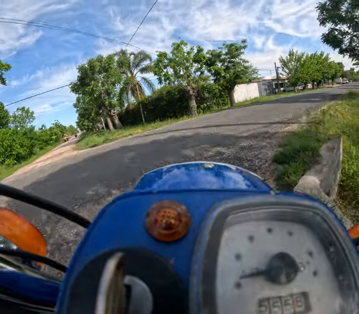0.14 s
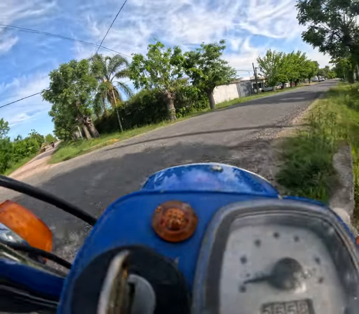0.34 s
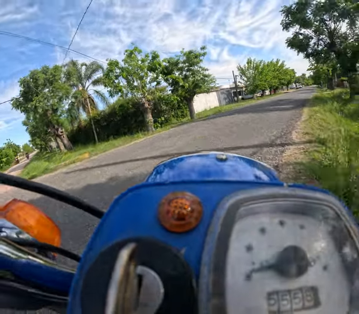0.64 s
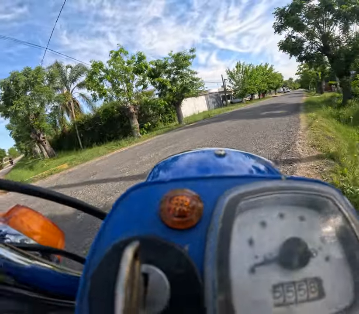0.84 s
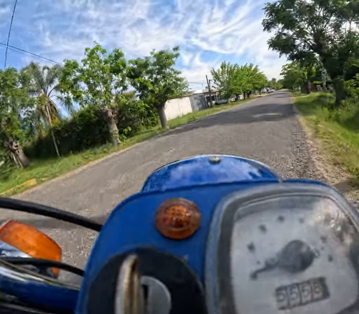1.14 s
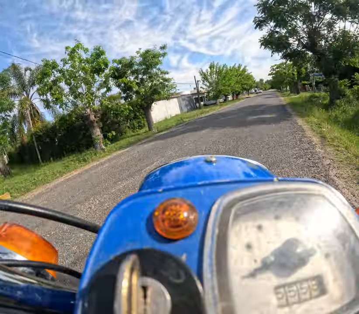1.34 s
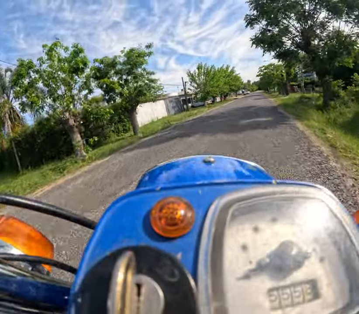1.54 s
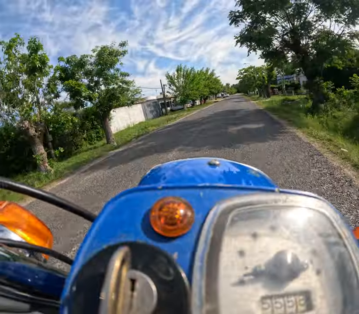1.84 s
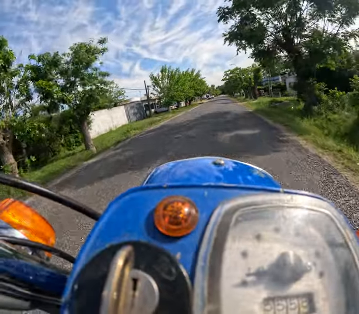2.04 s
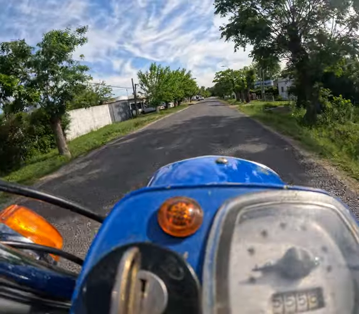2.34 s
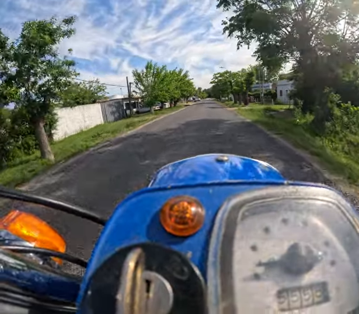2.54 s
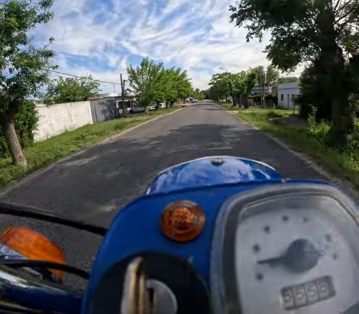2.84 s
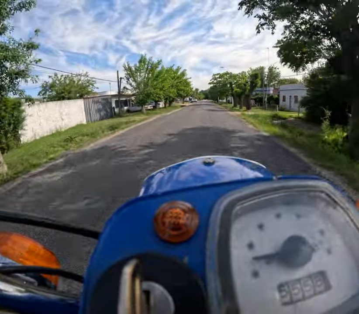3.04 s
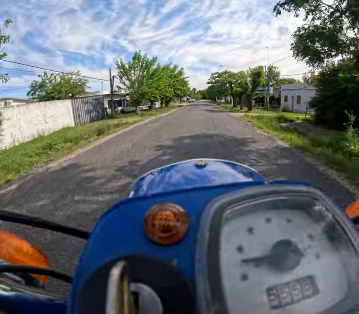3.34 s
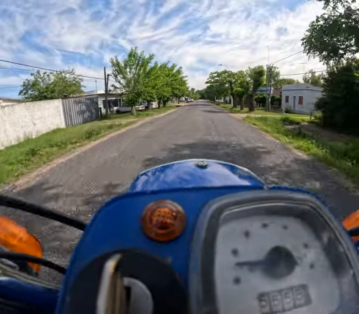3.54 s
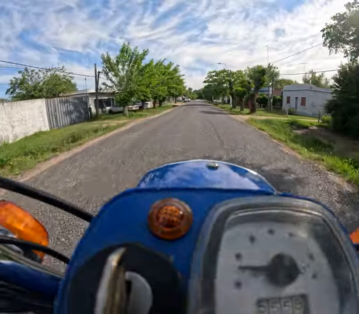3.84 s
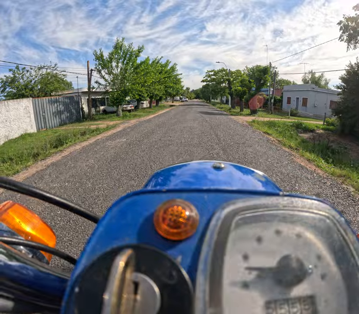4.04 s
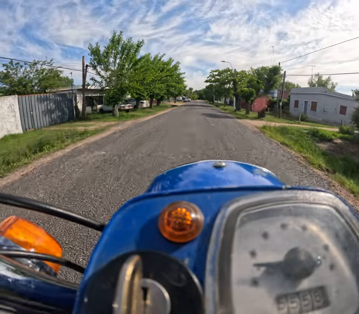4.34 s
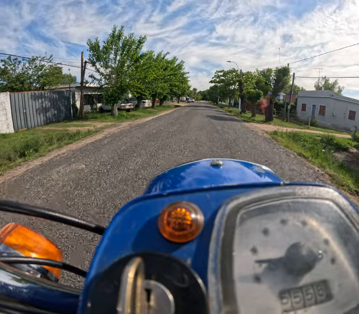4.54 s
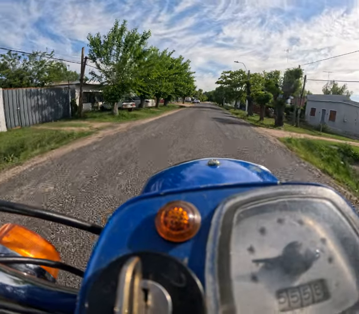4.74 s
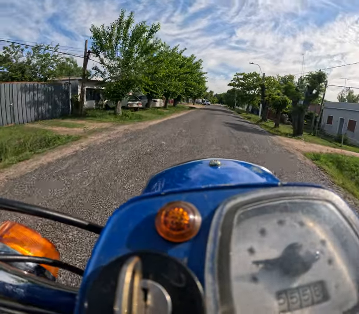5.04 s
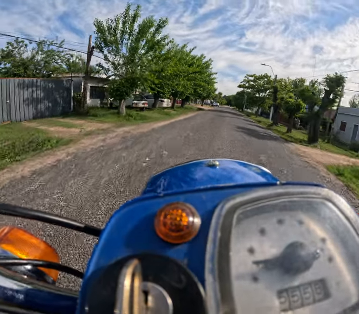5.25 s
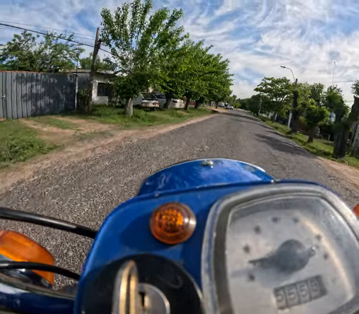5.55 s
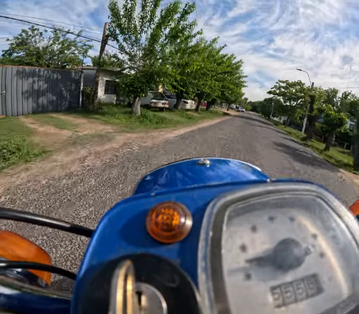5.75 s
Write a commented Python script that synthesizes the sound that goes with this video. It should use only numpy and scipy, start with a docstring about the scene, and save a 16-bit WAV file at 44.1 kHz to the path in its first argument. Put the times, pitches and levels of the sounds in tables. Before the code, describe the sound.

A small two-stroke moped is heard close up from behind its handlebar, with tyres roaring on asphalt and wind buffeting the microphone throughout. The engine putters at first, then at about 0.6 seconds the throttle opens with a brief bark into a raspy, clattering drone, rising in pitch until nearly 2 seconds and sagging slightly afterwards. Bumps knock the plastic panels around 0.7 to 1.1 seconds, ending in a sharp clack. At about 2.8 seconds the throttle shuts, the engine stumbles in a few dull thumps, and its note drops and fades. The moped coasts on with humming bodywork and low wind rumble. Irregular hollow pops burble in the exhaust from about 3.3 to 5.3 seconds, thickest between 3.7 and 4.7. Loose metal fittings rattle lightly around 3.7 seconds, and from 5 seconds to the end a run of bumps brings more thuds and rattles.

```python
"""A small two-stroke moped pulls away along a street, heard from just behind its handlebar.
Its firings drone and pop through the exhaust while piston and gears clatter; near three seconds the
throttle shuts and it coasts, stray charges burbling in the pipe. Tyres roar on asphalt, the bodywork
hums, wind buffets the microphone, and bumps knock the plastic panels and rattle loose fittings."""
import sys
import numpy as np
from scipy import signal
from scipy.fft import rfft, irfft, next_fast_len
from scipy.io import wavfile

SR = 44100
rng = np.random.default_rng(int(sys.argv[2]) if len(sys.argv) > 2 else 0)


def unload_audio(sound):
    """Save the sound as a 16-bit wav file, at the path given as the first command line argument."""
    columns = np.transpose(np.atleast_2d(sound))
    # keep every value between -1 and 1, then stretch to whole-number steps
    steps = np.round(np.clip(columns, -1, 1) * 32767)
    wavfile.write(sys.argv[1], SR, steps.astype(np.int16))


N = 259749
T = np.arange(N) / SR

# engine speed: time_s, firings_per_s
ENGINE_SPEED = [(0, 59.3), (.1, 59.9), (.3, 63.2), (.7, 68), (1.0, 71.4), (1.5, 73.3), (1.8, 73.5),
                (2.1, 71.5), (2.4, 70.7), (2.76, 68.6), (2.85, 65.7), (3.1, 57.3), (4.2, 46.5), (5.89, 40)]
# engine load, before the fall at throttle-off: time_s, pop_db, snarl_db
ENGINE_LOAD = [(0, -29, -56), (.3, -27, -68), (.5, -32, -45), (.7, -27, -35.5), (1.0, -33, -38.5),
               (1.6, -35, -36), (2.1, -49.5, -36), (2.4, -37, -31), (2.82, -35.5, -35)]
# thin top-end sizzle: time_s, level_db
SIZZLE_LEVEL = [(0, -90), (.65, -65), (1.1, -67), (2.0, -67), (2.8, -85), (3.0, -110), (4.9, -84.5),
                (5.5, -73), (5.89, -74)]
# tyres on the changing surface: time_s, roar_db, grit_db
TYRE_LEVELS = [(0, -27.5, -54), (.8, -23.5, -46), (1.6, -28, -49), (2.78, -33.5, -49), (2.98, -39, -74),
               (3.25, -36, -67), (3.65, -31, -54.5), (4.4, -29.5, -56), (5.3, -31, -54.5), (5.89, -33, -57)]
# bodywork hum: time_s, level_db
HUM_LEVEL = [(0, -35.5), (.8, -32), (1.6, -42.5), (3.35, -33), (3.8, -30), (4.25, -31.5), (4.55, -29),
             (4.8, -32), (5.05, -30.5), (5.3, -31.5), (5.89, -32.5)]
# wind bed: time_s, buffet_db, rumble_db
WIND_LEVELS = [(0, -27, -36), (.45, -23, -31), (.7, -23.5, -35), (1.0, -22, -41), (1.25, -24.5, -28),
               (1.5, -26.5, -37), (2.1, -28.5, -36), (2.9, -23, -24), (3.35, -26.5, -26), (4.3, -25, -25),
               (4.95, -28.5, -30), (5.6, -23, -31), (5.89, -27.5, -25)]
# gusts over the bed: centre_s, half_width_s, lift_db
GUSTS = [(1.056, 0.11, 4.5), (2.338, 0.08, 5), (2.782, 0.11, 2.5), (3.58, 0.049, 3.5), (4.55, 0.18, 4),
         (5.449, 0.072, 1.5)]
# bumps shaking the front end: start_s, thud_db, clack_db, decay_s
BUMPS = [(.725, -37, -31, 0.0089), (.915, -25, -26, 0.026), (1.051, -23, -13, 0.0029),
         (3.744, -29, -32, 0.015), (4.157, -33, -30.5, 0.028), (5.136, -21.5, -34, 0.014),
         (5.230, -20.5, -29.5, 0.018), (5.32, -17, -28.5, 0.018), (5.40, -27, -31, 0.0097),
         (5.522, -21, -41, 0.018), (5.687, -21.5, -44, 0.01)]
# loose fittings rattling: start_s, level_db, ring_offset_db, decay_s
RATTLES = [(.727, -36, 0, .007), (.93, -44, -6, .007), (1.05, -32, -2, 0.0065), (3.631, -32.5, -11, 0.008),
           (3.693, -36, -4, 0.0088), (3.7502, -34.5, -5, 0.0069), (3.8322, -41, -4, .008),
           (4.1631, -38.5, -7, 0.0085), (5.032, -31.5, -8, 0.007), (5.143, -32.5, 0, 0.0044),
           (5.162, -41, 5, .004), (5.2432, -32, -5, 0.004), (5.328, -39.5, 2, 0.008),
           (5.408, -37, -8, .007), (5.421, -37, -15, .005), (5.462, -46, 4, .004), (5.526, -30, -4, 0.0064),
           (5.6935, -41, 1, .008), (5.771, -35, -11, .003), (5.828, -34, -3, 0.0072)]
# last stumbling firings: centre_s, thump_db
SPUTTERS = [(2.885, -21), (2.942, -16.5), (2.975, -21), (3.013, -17), (3.05, -26)]
# stray charges in the pipe: start_s, level_db
BURBLES = [(3.258, -17.5), (3.677, -10), (3.791, -20), (3.861, -19), (3.897, -13), (3.969, -18),
           (4.023, -18), (4.26, -16.5), (4.296, -11.5), (4.409, -9), (4.469, -13), (4.532, -11),
           (4.591, -13), (4.635, -9.5), (4.83, -16), (4.91, -11.5), (5.255, -13.5)]

# bodywork resonances and dips: centre_hz, width_hz, lift_db
BODY_RESONANCES = [(347, 88, 9.5), (579, 172, 6.5), (827, 140, -4), (1124, 356, 6), (1349, 93, 3),
                   (2350, 96, 1.5), (2530, 100, -2.5), (2730, 92, 0.5), (3386, 96, 1), (3660, 200, 2.5),
                   (3840, 65, -5.5), (4600, 140, 2), (5560, 290, 2.5), (6260, 650, 3), (12700, 1500, 5.5)]
# tone colour of each layer before the bodywork: frequency_hz, relative_db
RASP_EQ = [(100, -20), (190, 4), (260, -0.5), (450, 3), (850, -1), (1400, 3.5), (2000, -3.5), (2800, -7),
           (3900, -8.5), (5000, -21), (7500, -28.5), (9000, -43.5), (13000, -55), (16000, -71)]
KNOCK_EQ = [(200, -27), (300, 15), (430, -0.5), (700, -1.5), (850, -10), (1300, 5), (1650, -10.5),
            (2000, -13), (3200, 1.5), (5000, -46.5), (16000, -72)]
POP_EQ = [(150, -38.5), (250, -6), (320, -11.5), (385, 10.5), (425, 3.5), (490, -25), (570, -20.5),
          (800, -6.5), (1200, -22.5), (2000, -30.5), (5000, -57.5), (16000, -87)]
SNARL_EQ = [(500, -19.5), (1000, -21.5), (1350, -19.5), (1480, -5), (1570, 2.5), (1720, 0), (1900, -10),
            (4200, -19.5), (6000, -38.5), (16000, -77)]
SHELL_EQ = [(350, -37), (520, -26), (610, 13.5), (760, -27), (1000, -2), (1170, 8.5), (1350, -5),
            (1600, -19.5), (5000, -44), (16000, -86)]
SIZZLE_EQ = [(6000, -33.5), (11500, -16.5), (12200, 4.5), (13500, 3), (15500, -27.5)]
HUM_EQ = [(150, -35), (255, -6.5), (300, -7.5), (338, -5), (380, -5.5), (450, -15), (900, -55),
          (4000, -78.5)]
ROAR_EQ = [(200, -0.5), (450, 0.5), (830, 1), (1350, -2), (2000, -5.5), (2900, -8), (3600, -12.5),
           (4300, -29.5), (7000, -44.5), (16000, -84.5)]
GRIT_EQ = [(2500, -27.5), (4000, 1), (5000, -3.5), (7300, -8.5), (9000, -20), (12000, -25.5),
           (16000, -47.5)]
BUFFET_EQ = [(15, -17), (40, -23), (60, 1), (110, -0.3), (170, -5.5), (250, -17), (450, -36), (2000, -74),
             (16000, -100)]
RUMBLE_EQ = [(5, -12.5), (18, 4), (28, -1), (45, -0.5), (70, -10.5), (300, -61.5), (16000, -110)]
THUD_EQ = [(150, -6), (450, 5.5), (900, 2.5), (1500, -1), (2100, -9), (3600, -28), (5000, -34),
           (16000, -71)]
CLACK_EQ = [(600, -15.5), (1500, -3), (2200, -0.5), (2900, 2.5), (3600, -6.5), (4400, -15.5), (5500, -21.5),
            (16000, -52)]
JINGLE_EQ = [(800, -1), (3000, 9.5), (4500, 8.5), (6000, 3.5), (8000, -11.5), (10500, -9), (12500, -18),
             (16000, -29)]
# ringing metal of the cooling fins, a panel bracket and a loose fitting: pitch_hz, gain_db, t60_s
FIN_MODES = [(1064, -19.5, 0.043), (1164, -19.5, 0.05), (1710, -25, 0.035), (2288, -25.5, .04),
             (2710, -21.5, 0.055), (2834, -21.5, 0.035), (3310, -22.5, .035), (3410, -20, 0.045)]
BRACKET_MODES = [(1910, 3, .08), (2760, 12, 0.058), (3020, -6, .05), (3180, 7, .045), (4000, 6, 0.045)]
FITTING_MODES = [(2280, 8, .05), (4050, 2, .04), (4910, 5.5, 0.057), (5400, 5, .04), (5620, 11, 0.062),
                 (5900, 6, .05), (6330, 3, .04), (6880, 3, 0.044), (7450, -1, .035), (10100, -10, .03),
                 (12230, -11, .03)]

# exhaust harmonics 1-3, moved on and off the pipe's resonances by the revs: level_db, slope_db_per_hz
PUTTER = [(-19, -1.94), (-25, -0.22), (-28, -0.38)]
DRONE = [(-24, 1.5), (-17, -0.33), (-33, -1.7)]
PUTTER_HZ, DRONE_HZ = 62.6, 68.6   # firing rates the slopes start from
BARK_DB, BARK_HOLD_S = (-7.5, 0.5, 8.5), 0.23   # harmonics 1-3 tilt bright as the throttle opens
OPEN_S, SHUT_S, TWIST_S = 0.639, 2.826, 0.026   # throttle cues; length of one turn of the grip


def from_db(db):
    """Decibels to gain."""
    return 10 ** (np.asarray(db) / 20)


def unit_power(x):
    """Scale to an RMS of one."""
    return x / np.sqrt(np.mean(x ** 2) + 1e-20)


def curves(rows):
    """Each column of a timed table, drawn out to every sample."""
    times, *columns = np.transpose(rows)
    return [np.interp(T, times, column) for column in columns]


def drift(rate_hz):
    """Smooth random wobble with a spread of one."""
    pole = np.exp(-80 * np.pi * rate_hz / SR)
    slow = signal.lfilter([1], [1, -2 * pole, pole * pole], rng.standard_normal(N // 40 + 2002))[2000:]
    return np.interp(np.arange(N) / 40, np.arange(len(slow)), unit_power(slow))


def twist(at_s):
    """A quick turn of the grip, from 0 to 1."""
    return np.clip((T - at_s) / TWIST_S + .5, 0, 1)


def fade(from_s, fade_s):
    """Holds at 1, then dies away."""
    return np.exp(-np.maximum(T - from_s, 0) / fade_s)


def burst(start_s, rise_s, decay_s):
    """A quick swell that dies away."""
    age = np.maximum(T - start_s, 0)
    return (1 - np.exp(-age / rise_s)) * np.exp(-np.minimum(age / decay_s, 20))


def throttle_off(drop_db, settle_s):
    """Gain that ducks an engine layer once the throttle shuts."""
    return from_db(-drop_db * (1 - fade(SHUT_S - TWIST_S / 2, settle_s)))


def through_body(x, eq):
    """Colour a layer with its own EQ and the bodywork resonances, at unit power gain."""
    size = 2 * next_fast_len(N // 2 + SR // 10)
    hz = np.arange(size // 2 + 1) * SR / size
    eq_hz, eq_db = np.transpose(eq)
    db = np.interp(np.log(hz + 1), np.log(eq_hz), eq_db)
    for centre, width, lift in BODY_RESONANCES:
        db += lift / (1 + (2 * (hz - centre) / width) ** 2) ** 2
    cepstrum = irfft(np.log(unit_power(from_db(db))))
    cepstrum[1:size // 2] *= 2   # minimum phase: resonances ring after the blow
    cepstrum[size // 2 + 1:] = 0
    return irfft(rfft(x, size) * np.exp(rfft(cepstrum)))[:N]


def noise(eq, flutter_db, flutter_hz, pulse=1):
    """Fluttering noise, optionally pulsed, sounding through the bodywork."""
    rush = rng.standard_normal(N) * pulse * from_db(flutter_db * drift(flutter_hz))
    return through_body(unit_power(rush), eq)


def ring(blows, modes):
    """Struck metal rings in a set of decaying modes."""
    out = 0
    for hz, db, t60_s in modes:
        radius, angle = from_db(-60 / (t60_s * SR)), 2 * np.pi * hz / SR
        gain = from_db(db) * np.sin(angle) * np.sqrt(2 * (1 - radius ** 2))
        out += signal.lfilter([gain], [1, -2 * radius * np.cos(angle), radius ** 2], blows + 1e-18)
    return out


def strikes(turns, phase, uneven_db, jitter_s, wander_s):
    """One click a turn at a given phase of the crank, loose in timing and force."""
    whole_turns = np.arange(int(turns[-1]))
    timing, force = rng.standard_normal((1000, 2))[:len(whole_turns)].T
    when = np.interp(whole_turns + phase, turns, T)
    when += jitter_s * timing + wander_s * np.interp(when, T, drift(2.06))
    clicks = np.zeros(N)
    clicks[np.clip((when * SR).astype(int), 0, N - 1)] = from_db(uneven_db * force)
    return unit_power(clicks)


def knocks(turns, count, uneven_db, jitter_s=0.00004, wander_s=0.0001):
    """Ports, piston and gears strike at crank angles of their own."""
    phases = (np.arange(count) + rng.random(count)) / count
    parts = (rng.choice([-1, 1]) * strikes(turns, phase, uneven_db, jitter_s, wander_s)
             for phase in phases)
    return unit_power(sum(parts))


def clatter(turns):
    """Metal knocks, ringing cooling fins and a rasp of gas that swells with each turn of the crank."""
    metal = through_body(knocks(turns, count=8, uneven_db=4), KNOCK_EQ)
    soften = signal.butter(4, 3600, fs=SR, output="sos")
    fin_blows = signal.sosfilt(soften, knocks(turns, count=5, uneven_db=1))
    pulse = 1 + 0.12 * (np.cos(2 * np.pi * turns) + np.cos(4 * np.pi * turns))
    rasp = noise(RASP_EQ, flutter_db=0.7, flutter_hz=32, pulse=pulse)
    return from_db(-5.5) * metal + ring(fin_blows, FIN_MODES) + from_db(-3) * rasp


def exhaust(turns, firing_hz, dulling_db=9, waver_db=0.68, lead_rad=0.75):
    """The silencer leaves three low harmonics: a putter on light throttle, a drone when wide open."""
    shut = twist(SHUT_S)
    wide_open = twist(OPEN_S) - shut
    bark = fade(OPEN_S + BARK_HOLD_S, fade_s=0.054)
    out = 0
    for k, ((putter_db, putter_slope), (drone_db, drone_slope)) in enumerate(zip(PUTTER, DRONE)):
        putter = putter_db + putter_slope * np.maximum(firing_hz - PUTTER_HZ, 0) - dulling_db * k * shut
        drone = drone_db + drone_slope * (firing_hz - DRONE_HZ) + BARK_DB[k] * bark
        level_db = putter + wide_open * (drone - putter) + waver_db * drift(25)
        out += from_db(level_db) * np.cos(2 * np.pi * (k + 1) * turns + k * lead_rad * wide_open)
    return np.sqrt(2) * fade(from_s=2.9, fade_s=0.13) * out


def engine():
    """One firing a turn: exhaust tone, pops and clatter, a snarl under strain and a sizzle on top."""
    firing_hz, = curves(ENGINE_SPEED)
    pop_db, snarl_db = curves(ENGINE_LOAD)
    sizzle_db, = curves(SIZZLE_LEVEL)
    turns = np.cumsum(firing_hz * (1 + .002 * drift(12))) / SR
    clatter_db = -24.5 + 0.079 * (pop_db - pop_db.mean())   # faintly follows the pops
    machinery = from_db(clatter_db) * clatter(turns)
    firings = strikes(turns, phase=0, uneven_db=1.8, jitter_s=0.00005, wander_s=0.00007)
    pops = from_db(pop_db) * through_body(firings, POP_EQ)
    strain = knocks(turns, count=4, uneven_db=4.5, wander_s=0.00012)
    snarl = from_db(snarl_db) * through_body(strain, SNARL_EQ)
    return (machinery * throttle_off(drop_db=19.5, settle_s=0.47)
            + pops * throttle_off(drop_db=10.5, settle_s=0.033)
            + snarl * throttle_off(drop_db=18, settle_s=0.048)
            + exhaust_shell(turns)
            + exhaust(turns, firing_hz)
            + from_db(sizzle_db) * noise(SIZZLE_EQ, flutter_db=3.5, flutter_hz=120))


def road(shake_hz=27):
    """Tyres roar and hiss on coarse asphalt, throbbing as the front end shakes; the bodywork hums."""
    roar_db, grit_db = curves(TYRE_LEVELS)
    hum_db, = curves(HUM_LEVEL)
    shake = 2 * np.pi * np.cumsum(shake_hz * (1 + 0.076 * drift(1.6))) / SR
    throb_db = 0.5 * (np.cos(shake) + 0.63 * np.cos(2 * shake) + 0.75 * np.cos(4 * shake))
    hum = from_db(hum_db) * through_body(rng.standard_normal(N), HUM_EQ)
    roar = from_db(roar_db + throb_db) * noise(ROAR_EQ, flutter_db=1.05, flutter_hz=45)
    grit = from_db(grit_db + throb_db) * noise(GRIT_EQ, flutter_db=1.5, flutter_hz=60)
    return hum + roar + grit


def wind():
    """Small eddies buffet the microphone, large ones rumble below them, and gusts lift both."""
    buffet_db, rumble_db = curves(WIND_LEVELS)
    gust_db = sum(db * np.exp(-((T - centre_s) / width_s) ** 2) for centre_s, width_s, db in GUSTS)
    buffet = from_db(buffet_db + gust_db) * noise(BUFFET_EQ, flutter_db=1.3, flutter_hz=28)
    rumble = from_db(rumble_db + 0.42 * gust_db) * noise(RUMBLE_EQ, flutter_db=2, flutter_hz=8)
    return buffet + rumble


def panels(bracket_lag_s=0.00137):
    """Bumps thud through the plastic panels, clack their edges and set a metal bracket ringing."""
    thuds, clacks, blows = np.zeros((3, N))
    for start_s, thud_db, clack_db, decay_s in BUMPS:
        jolt = burst(start_s, rise_s=0.0023, decay_s=decay_s)
        thuds += from_db(thud_db) * jolt
        clacks += from_db(clack_db) * jolt
        blows[int((start_s + bracket_lag_s) * SR)] = from_db(clack_db)
    return (through_body(thuds * rng.standard_normal(N), THUD_EQ)
            + through_body(clacks * rng.standard_normal(N), CLACK_EQ)
            + ring(blows, BRACKET_MODES))


def fittings(jingle_db=-0.5, ring_send_db=-27):
    """Each jolt sets off a flurry of tiny metal contacts and leaves the loose fitting ringing."""
    contacts = unit_power(rng.standard_normal(N) * from_db(4.8 * drift(606)))
    flurries, blows = np.zeros((2, N))
    for start_s, db, ring_offset_db, decay_s in RATTLES:
        flurries += from_db(db) * contacts * burst(start_s, rise_s=0.0021, decay_s=decay_s)
        blows[int(start_s * SR)] = from_db(db + ring_offset_db)
    jingle = from_db(jingle_db) * through_body(flurries, JINGLE_EQ)
    return jingle + ring(blows + from_db(ring_send_db) * flurries, FITTING_MODES)


def exhaust_shell(turns, level_db=-38, surge_db=4.5):
    """The exhaust's shell rings in uneven surges through the first part of the coast."""
    blows = knocks(turns, count=4, uneven_db=5.5, jitter_s=0.00024, wander_s=0.00031)
    early_coast = twist(SHUT_S) * fade(from_s=4.24, fade_s=0.14)
    return from_db(level_db + surge_db * drift(39)) * early_coast * through_body(blows, SHELL_EQ)


def sputters(width_s=0.0035):
    """Just after the throttle shuts, the firing stumbles in a few dull thumps."""
    out = 0
    for centre_s, db in SPUTTERS:
        offset = (T - centre_s) / width_s
        out += from_db(db) * (1 - offset ** 2 / 2) * np.exp(-offset ** 2 / 4)
    return out


def burbles(pipe_hz=336, pitch_spread=0.036):
    """Stray charges set the pipe ringing on the coast, each at a slightly different pitch."""
    out = 0
    for start_s, db in BURBLES:
        hz = pipe_hz * (1 + pitch_spread * rng.standard_normal())
        envelope = from_db(db) * burst(start_s, rise_s=0.0059, decay_s=0.014)
        out += envelope * np.sin(2 * np.pi * hz * (T - start_s))
    return out


def scene():
    """A mono mix in which every source rides along with the microphone."""
    return (engine() + road() + wind() + panels() + fittings() + sputters() + burbles())[None]


def record(dry):
    """A steep low-pass trims the air above 15.7 kHz."""
    return signal.sosfilt(signal.ellip(10, .1, 80, 15700, fs=SR, output="sos"), dry)


dry = scene()
out = record(dry)
unload_audio(out)
```